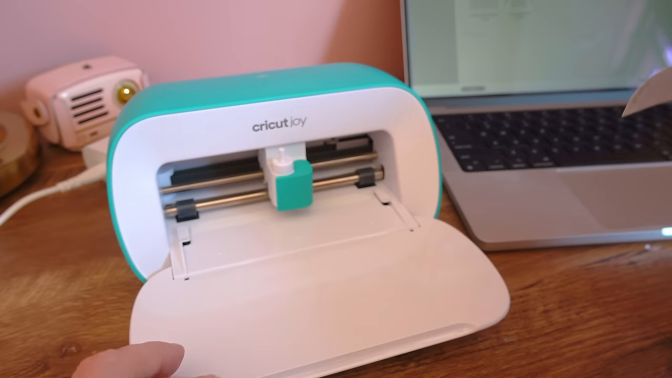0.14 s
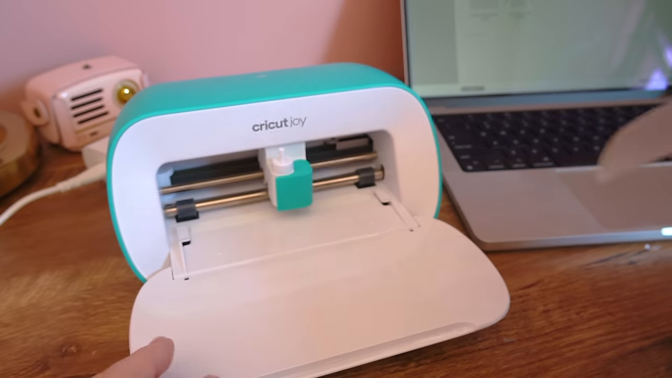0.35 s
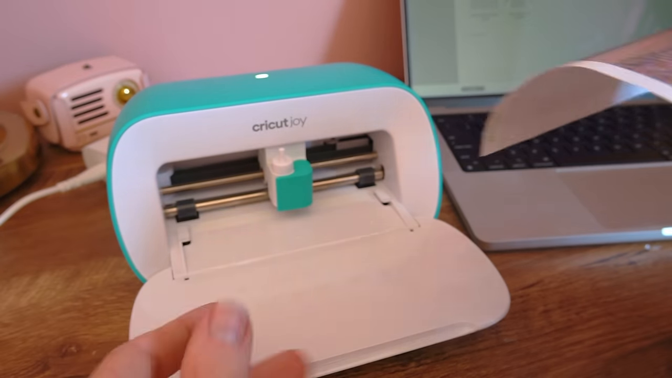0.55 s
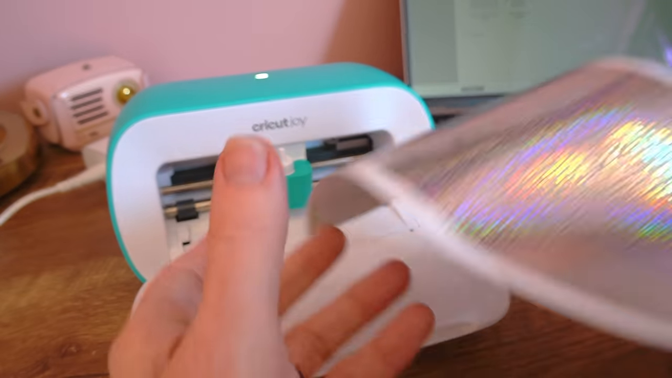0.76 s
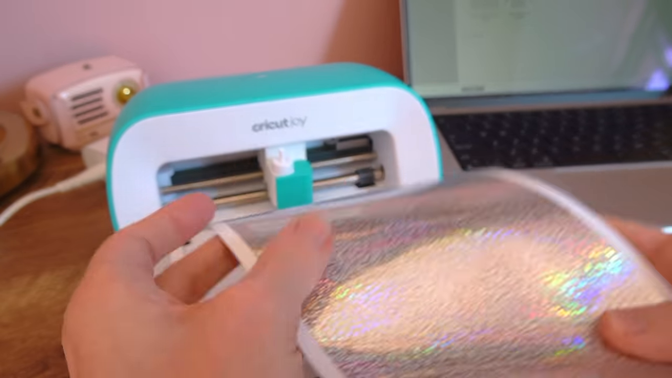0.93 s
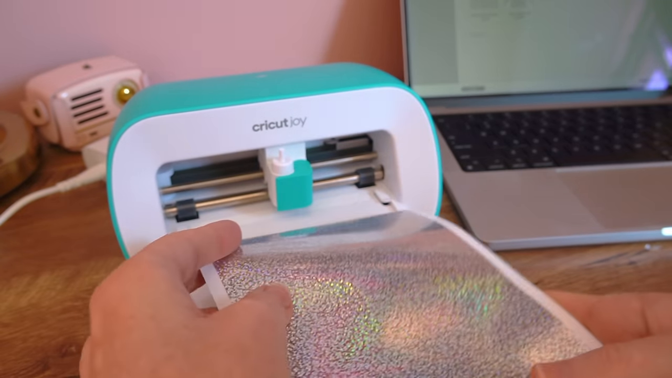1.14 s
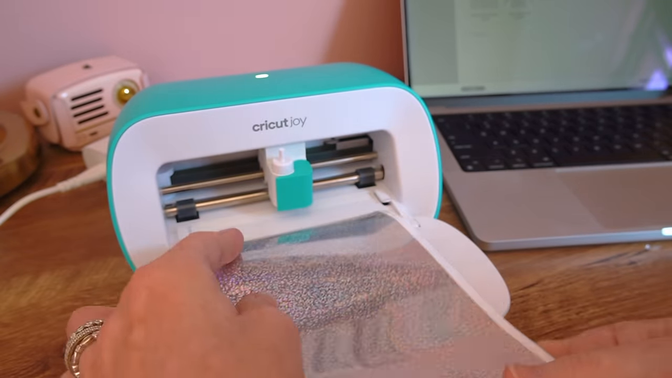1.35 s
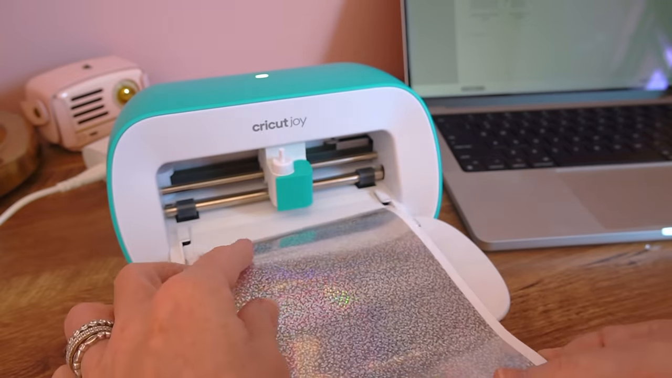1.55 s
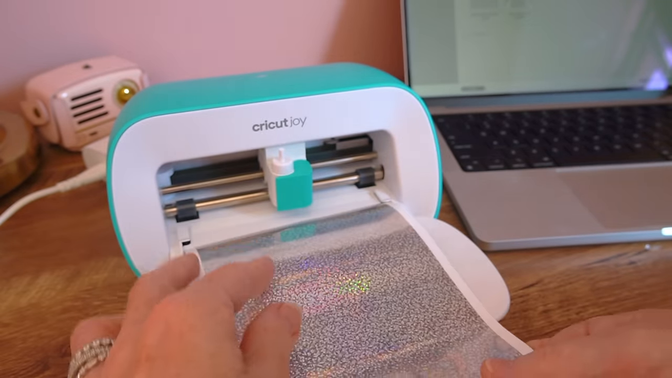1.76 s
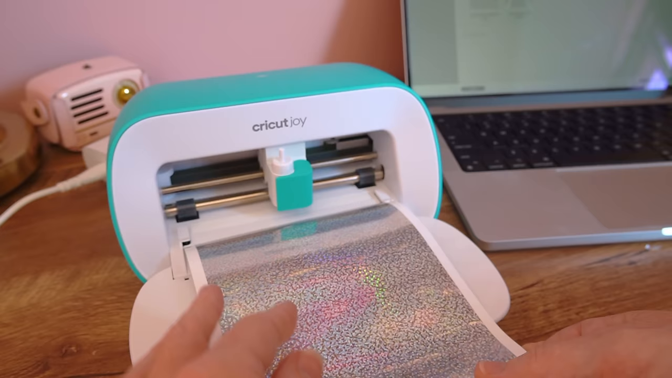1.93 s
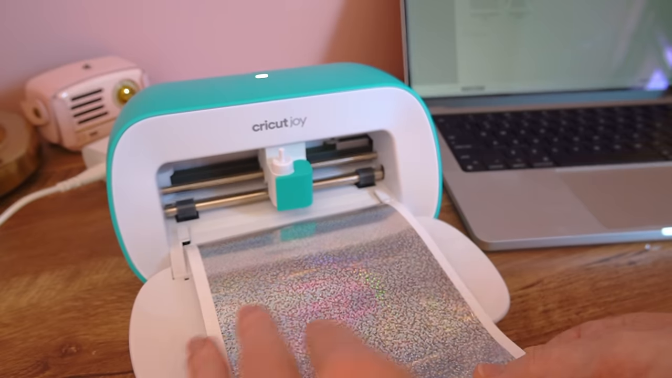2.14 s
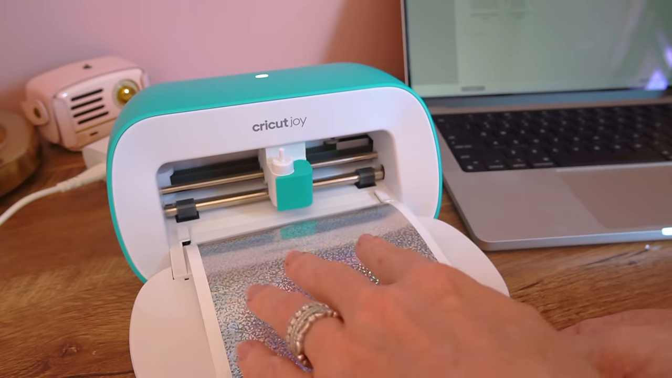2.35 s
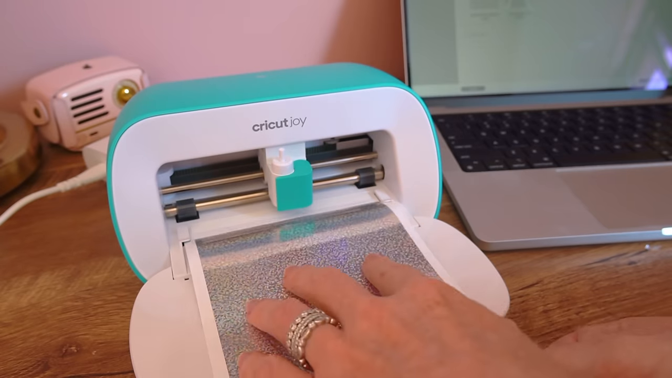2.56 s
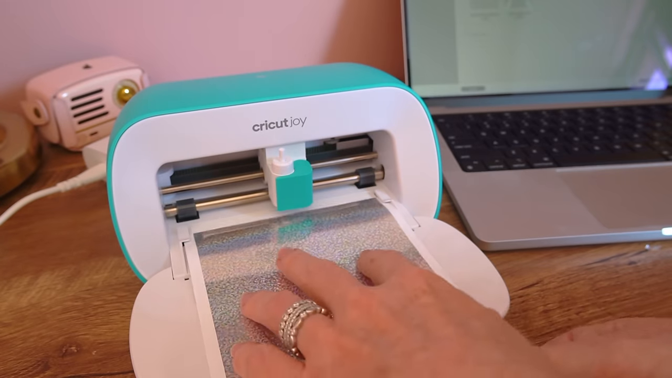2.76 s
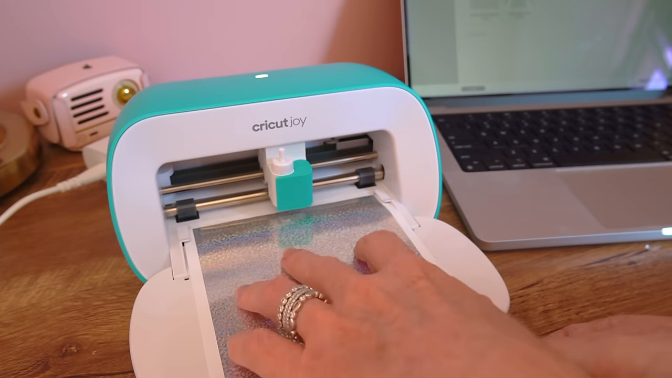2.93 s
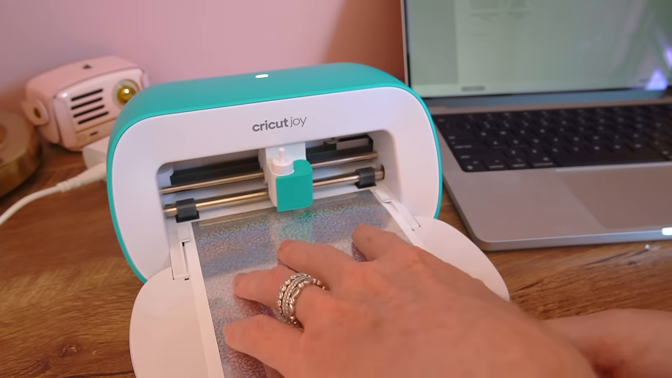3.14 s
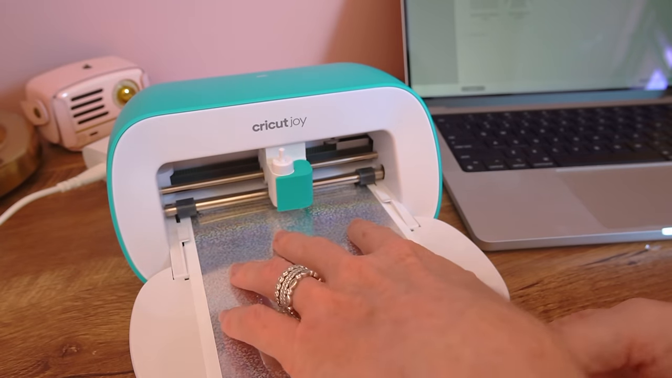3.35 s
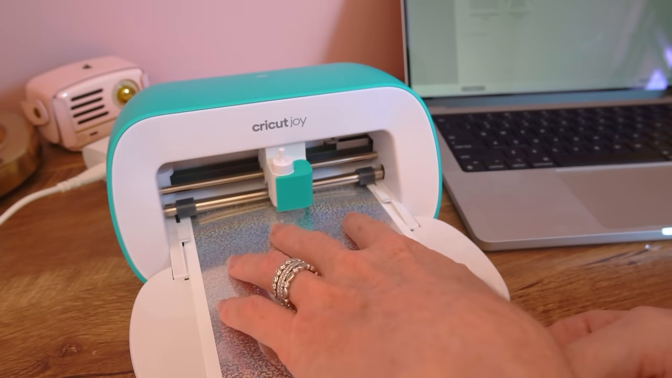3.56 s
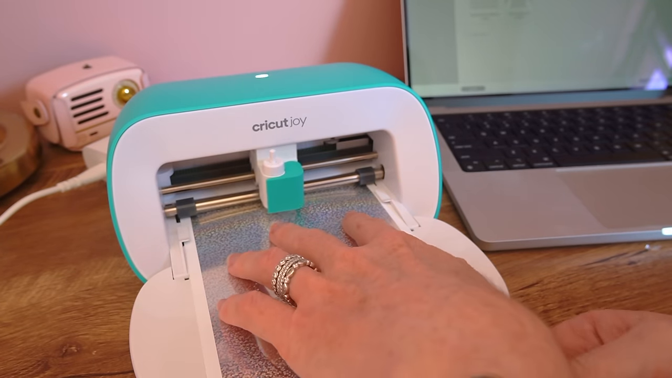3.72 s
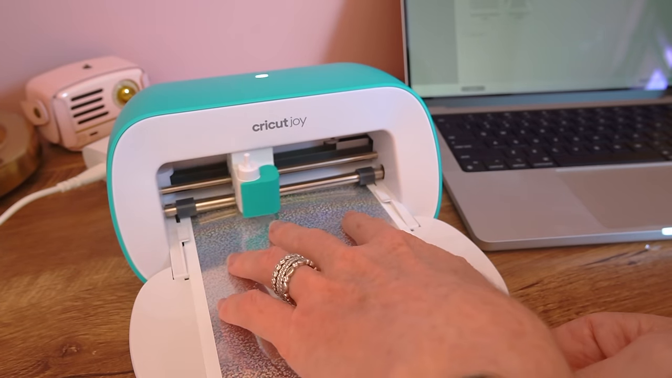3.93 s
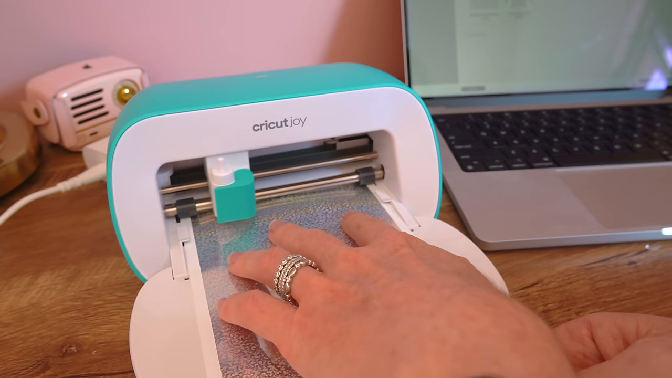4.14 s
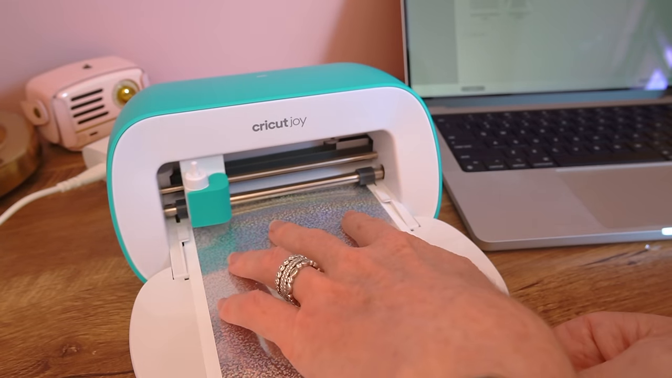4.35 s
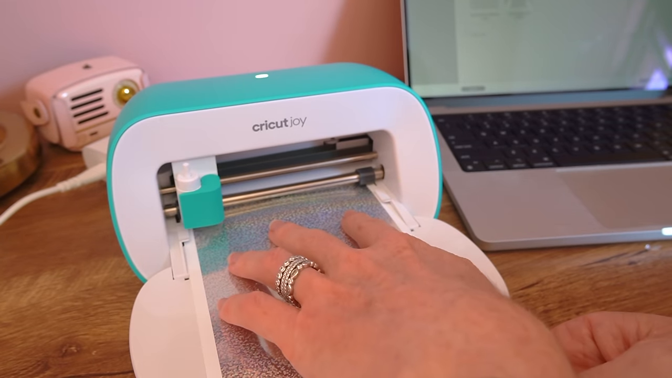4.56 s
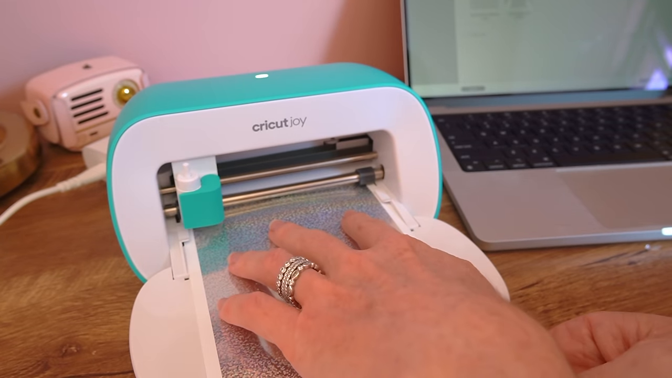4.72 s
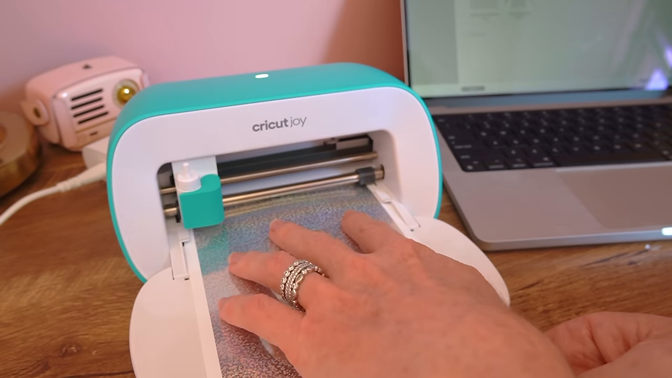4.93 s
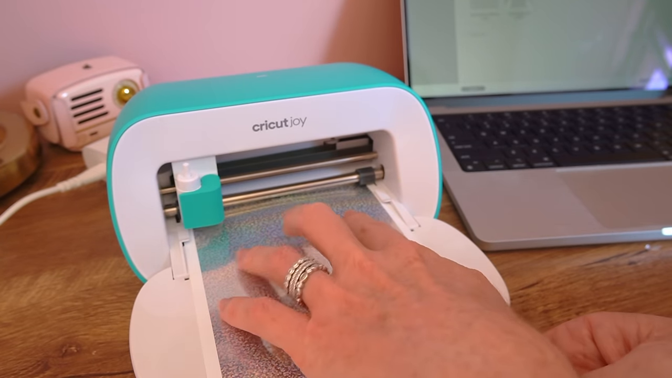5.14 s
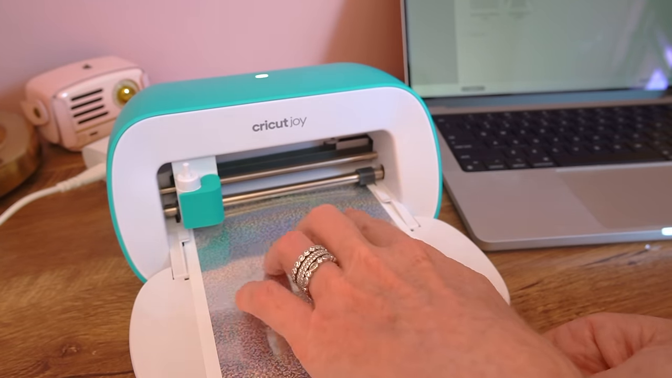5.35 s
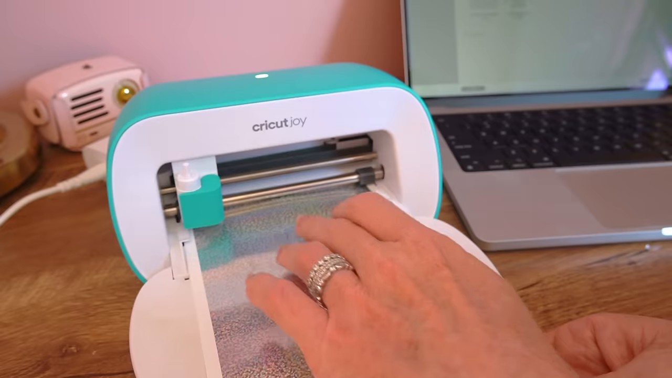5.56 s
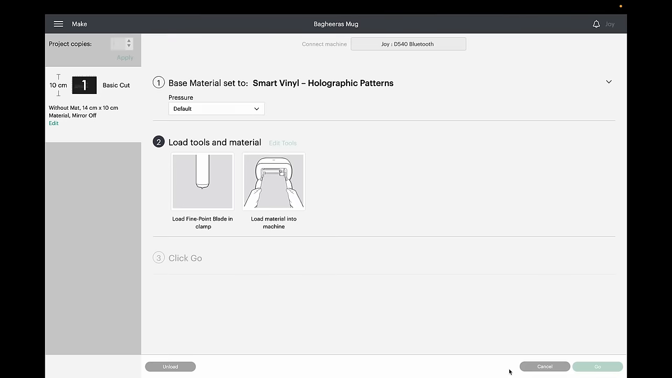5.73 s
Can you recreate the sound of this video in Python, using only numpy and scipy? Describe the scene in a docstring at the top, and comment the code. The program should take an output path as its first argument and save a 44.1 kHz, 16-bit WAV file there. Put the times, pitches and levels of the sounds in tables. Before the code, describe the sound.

A small, quiet room is heard from a microphone close to a desktop cutting machine, with soft air, a low rumble and a faint engine far outside until about 3.5 seconds. A stiff vinyl sheet ticks at 0.8 seconds and gives one loud, sharp snap at 1 second. It rubs and ticks softly on the plastic tray, with crisper cracks around 2.4 to 2.6 seconds. At 2.9 seconds the feed motor starts with a small jolt and its gears growl until 3.5. A few clacks at 3.6 lead into a louder, steady, medium-pitched whine with gear rattle. It ends at 4.4 seconds in a firm knock that rings the case, leaving a faint, thin tone fading. Quiet finger rubs and ticks follow. At 5.7 seconds a motor spins up again with a slight high squeak and a louder rising whine, lasting about a quarter second.

```python
"""A small, quiet room, one microphone close to a desk-top cutter. Hands slide a stiff plastic sheet
onto the tray; it rubs, snaps and ticks. The feed motor grips the sheet and its gears growl, then the
carriage motor whines across and knocks on its stop, ringing the case. After a pause a motor spins up
again with a brief squeak. Behind it all lie a low rumble, the room's air and an engine far outside."""
import sys
import numpy as np
from scipy import signal
from scipy.fft import rfft, irfft
from scipy.io import wavfile
from scipy.ndimage import uniform_filter1d

SR = 44100
rng = np.random.default_rng(int(sys.argv[2]) if len(sys.argv) > 2 else 0)


def file_out(sig):
    """Save sig as 16-bit WAV at sys.argv[1]."""
    # one column per channel
    cols = np.atleast_2d(sig).T
    # limit, then scale
    lim = np.clip(cols, -1, 1)
    pcm = np.round(lim * 32767).astype(np.int16)
    wavfile.write(sys.argv[1], SR, pcm)


N = 259749
TIME = np.arange(N) / SR

PINION_TEETH, POLES, CHOPPER_HZ = 11, 5, 15070
FEED_HZ, CRUISE_HZ = 14.95, 35.28  # shaft speeds of the feed and carriage motors
# Motor runs by name: on t/s, off t/s, silent t/s, starting shaft f/Hz, full shaft f/Hz, spin-up t/s,
# spin-up length/s, whine level/dB, whine swell/s, rattle level/dB, rattle swell/s, chopper level/dB,
# fade/(dB/s)
RUNS = {"feed": (2.908, 3.535, 3.6, FEED_HZ, FEED_HZ, 2.9, .01, -46, .008, -33, .008, -75, 110),
        "carriage": (3.59, 4.388, 4.62, 30, CRUISE_HZ, 3.59, .1, -29.5, .1, -35, 0.018, -68, 190),
        "restart": (5.7, 7, 5.95, 24, 35.5, 5.74, .15, -19, 0.02, -26, 0.04, -77, 100)}
# Lines of each motor's whine: multiple of shaft speed, relative level/dB
FEED_ORDERS = [(10, -5.5), (12.5, -3), (15, -4.5), (25, 0.5), (33, -5), (53, -0.5), (75, 0.5)]
CARRIAGE_ORDERS = [(3, -30.5), (5, -24), (10, -36), (11, 1.5), (13, -23.5), (15, -11.5), (22, -9.5),
                   (26, -17.5), (27, -21), (28, -18), (29, -17.5), (30, -26), (32, -16), (33, -5),
                   (33.8, -16.5), (35, -21.5), (44, -21), (45, -26.5), (46, -24), (67, -31.5), (86, -33),
                   (88, -30), (89, -33), (90, -22.5), (91, -30.5), (98, -31.5), (102, -38), (104, -29.5)]
RESTART_ORDERS = [(11, 2.5), (22, -11), (33, -27), (44, -32)]
# Gear rattle as heard through the plastic case: f/Hz, relative level/dB
FEED_COLOUR = [(50, -35), (110, -5), (270, -5.5), (450, 0.5), (700, -6.5), (950, -11.5), (1350, -13),
               (2000, -18), (2800, -20), (4000, -28), (5500, -32.5), (7500, -43), (10000, -53),
               (15000, -68)]
CARRIAGE_COLOUR = [(50, -13), (110, -14.5), (270, -11), (450, 1), (700, -6.5), (950, 2.5), (1350, -8),
                   (2000, -11.5), (2800, -14), (4000, -17), (5500, -22), (7500, -34), (10000, -41),
                   (15000, -57.5)]
RESTART_COLOUR = [(50, -40), (110, -27), (270, -9.5), (450, -8), (700, -16.5), (950, -11.5), (1350, -13),
                  (2000, -25.5), (2800, -27.5), (4000, -32), (5500, -39.5), (7500, -45.5), (10000, -52.5),
                  (15000, -62)]
# Case resonances on top of that rattle: f/Hz, width/Hz, lift/dB
FEED_RINGS = [(168.5, 28, 8.4), (373, 41, 9), (484, 49, 4.3), (829, 28, 12), (1133, 170, 14.1),
              (1480, 42, 3.3), (4730, 300, 5.9), (7900, 680, 4)]
CARRIAGE_RINGS = [(112, 19, 5.9), (178, 28, 6.3), (362, 89, 2.7), (455, 81, 3.5), (1220, 76, 9.9),
                  (1570, 180, 2), (2333, 100, 5.1), (3140, 255, 10.2), (3640, 300, 9.6), (6810, 89, 5.2),
                  (8760, 200, 4), (11200, 300, 5)]
RESTART_RINGS = [(660, 18, 17.8), (1028, 65, 12.3), (1184, 38, 11), (1393, 48, 3.7), (1750, 86, 4.1)]
# The case passes the whine unevenly: tooth-mesh f/Hz, gain/dB
MESH_GAIN = [(257, -4.5), (275, -3.5), (300, -12), (337, -9), (371, -1.5), (390, 0)]
# A brief dip in the whine: t/s, half width/s, gain/dB
WHINE_DIP = (4.28, .05, -3.5)
# The mechanism starting and stopping: t/s, peak level/dB, clack offset/dB
JOLTS = [(2.913, -19, -17), (3.562, -27, -14), (3.595, -24.5, -6), (3.602, -16.5, -10), (3.622, -21, -32.5),
         (3.651, -20.5, -28), (4.389, -10, 2), (4.466, -27, -14.5)]
# Modes of the case and of the tray: f/Hz, relative level/dB, t60/s
CASE_MODES = [(54.5, -25, 0.25), (116, -22.5, 0.2), (170.2, -14.5, 0.15), (231, -15, 0.11),
              (366.3, -4, 0.088), (523, -6, 0.064), (632, -10.5, 0.065), (951, -7.5, 0.03),
              (1017, -13, 0.053), (1227, -5.5, 0.029)]
TRAY_MODES = [(120, 4, .09), (175, 2, .06), (269.4, 0.5, .03), (380, -1, 0.041), (515, -0.5, .04),
              (690, 0, .035), (930, -3, .025), (1290, -4, .015)]
# The sheet snapping on the tray, close by: t/s, crack peak level/dB, crack f/Hz, edge offset/dB,
# thud offset/dB, thud centre f/Hz
TICKS = [(0.759, -26.5, 3120, -2, -3, 800), (0.8617, -42.5, 2870, -15, -22, 278),
         (0.9214, -27, 3260, -7.5, -27, 339), (1.0121, -2, 3050, -32, -20, 1000),
         (1.5457, -42, 3980, -22, -12, 657), (1.7173, -42.5, 1570, -20, 2.5, 704),
         (1.7694, -42.5, 1580, -11, -5, 522), (1.9287, -41, 2520, -20, 4, 670),
         (2.0197, -38, 2456, -22, -5, 490), (2.2516, -37, 1985, -14, -4.5, 686),
         (2.283, -34.5, 3160, -26, -16, 299), (2.315, -34.5, 2523, -23, -19, 645),
         (2.345, -37, 1570, -12, -6, 895), (2.4177, -21, 2140, -5, -13, 527),
         (2.42, -17, 2600, -4, -6.5, 564), (2.5496, -15, 2200, -7, -21.5, 705),
         (2.5773, -38.5, 1900, -4, -19, 312), (2.6228, -31.5, 1920, -6, -7, 730),
         (2.9914, -26.5, 2330, -28, -2, 705), (3.057, -29, 2270, -19, 2, 393),
         (3.263, -28.5, 2320, -12, -12, 377), (3.2891, -25, 1550, -9.5, -20, 480),
         (4.568, -42.5, 3500, -3, -3, 358), (4.7206, -45.5, 3500, -3, -9, 360),
         (4.7896, -51, 1510, -19, -8, 345), (5.106, -53.5, 1880, -12, 5, 353),
         (5.1419, -55, 1720, -11.5, 21, 258), (5.2052, -47, 1510, -3.5, 5, 400),
         (5.3301, -43.5, 1730, -5, 1, 330), (5.3994, -42, 3200, 1.5, -1.5, 256),
         (5.4778, -45, 1800, -13, 2.5, 258)]
# Sheet and fingers rubbing: t/s, bright level/dB, dull level/dB
RUB_LEVELS = [(0.0, -78, -67), (0.83, -66.5, -66.5), (1.1, -62, -62.5), (1.41, -57.5, -63),
              (1.66, -59, -62.5), (2.3, -63.5, -63.5), (2.45, -53.5, -58), (2.76, -56.5, -62.5),
              (2.9, -50.5, -64), (3.5, -70, -65), (4.5, -60.5, -54), (4.56, -76, -65), (4.9, -80, -74.5),
              (5.05, -80.5, -69), (5.23, -70.5, -65.5), (5.69, -72, -65)]
# Short scuffs of the sheet: t/s, length/s, bright level/dB, dull level/dB
SCUFFS = [(0.773, 0.053, -58, -76), (0.91, 0.084, -60, -76), (1.0, 0.13, -51, -48), (1.435, .04, -60, -56),
          (1.542, 0.03, -51, -63), (1.913, 0.051, -59.5, -62), (2.333, 0.049, -53, -59),
          (2.389, 0.12, -48.5, -51), (2.572, 0.042, -54, -57), (2.614, 0.036, -45.5, -49),
          (2.689, 0.077, -48, -51), (3.039, 0.048, -46, -63), (3.113, 0.063, -50, -60),
          (4.976, 0.04, -77.5, -61.5), (5.139, 0.026, -77, -58), (5.195, 0.05, -66, -57),
          (5.3, 0.077, -70, -61), (5.395, 0.05, -65, -58), (5.482, 0.088, -51, -49.5)]
# Bright and dull parts of the rubbing: f/Hz, relative level/dB
RUB_BRIGHT = [(600, -2.5), (1000, -2), (1500, -2.5), (2200, -4), (3200, -4), (4500, -9.5), (6000, -16.5),
              (8000, -23.5), (10500, -36), (15000, -46.5)]
RUB_DULL = [(150, -22), (300, 2), (700, -2.5), (1300, -13), (2200, -35.5)]
# Resonances of the sheet: f/Hz, width/Hz, gain/dB
SHEET_RINGS = [(1450, 240, -14), (2220, 300, -7.5), (3700, 400, -8), (4900, 510, -5.5), (8090, 430, 2.5)]
# Squeak at the start of the last run: t/s, length/s, f/Hz, level/dB
SQUEAK = (5.71, 0.2, 3749.5, -52.5)
# Engine far outside: t/s, firing f/Hz, level/dB, second harmonic level/dB
ENGINE_HUM = [(0, 42.3, -51, -66), (.3, 43.84, -48, -68), (.65, 44.2, -54, -60), (1.0, 44.2, -56, -70),
              (1.4, 47, -51.5, -70), (1.75, 50.4, -46.5, -72), (2.3, 50.1, -47, -76),
              (2.9, 48.8, -51.5, -66), (3.2, 46, -57, -62), (3.5, 44.7, -65, -75)]
# Rumble and still air around the microphone: f/Hz, relative level/dB
RUMBLE_COLOUR = [(15, 0), (30, -5), (60, 10.5), (110, -9), (175, 1.5), (300, -9.5), (500, -33)]
AIR_COLOUR = [(60, 1.5), (120, 5), (250, 0), (500, -13.5), (900, -24.5), (1600, -20.5), (3000, -31.5),
              (5000, -31), (8000, -37), (12000, -37), (15000, -38.5)]


def motor(run, orders, spectrum, rings, waver_db, slip, tooth_decay, shaft_db, repeat_share):
    """A geared motor close by: whine locked to the shaft, tooth rattle, and the chopped supply's tone."""
    shaft_hz, whine_db, rattle_db, chopper_db, running = motor_drive(*run)
    turns = np.cumsum(shaft_hz * (1 + slip * wander(30))) / SR
    whine = 0
    for order, db in orders:
        # the tooth-mesh line and its octave hold firm, the others come and go
        looseness = .3 if order in (PINION_TEETH, 2 * PINION_TEETH) else 1
        gain = amp(db + waver_db * looseness * wander(25.11))
        whine += gain * np.sin(2 * np.pi * (order * turns + rng.random()))
    # flaws of the gear come round on every turn; the rest of the rattle is new each time
    flaws = rng.standard_normal(1024)[(1024 * (turns % 1)).astype(int)]
    contact = np.sqrt(repeat_share) * flaws + np.sqrt(1 - repeat_share) * rng.standard_normal(N)
    tooth_bursts = np.exp(-tooth_decay * (PINION_TEETH * turns % 1))
    off_centre_swell = amp(shaft_db * np.sin(2 * np.pi * turns))
    rattle = colour(tooth_bursts * off_centre_swell * contact, spectrum, rings)
    commutator = 1 + .35 * np.cos(2 * np.pi * POLES * turns)
    chopper = commutator * np.sin(2 * np.pi * CHOPPER_HZ * TIME)
    tones = np.sqrt(2) * (amp(whine_db) * whine + amp(chopper_db) * chopper)
    return running * (tones + amp(rattle_db) * rattle)


def motor_drive(on_s, off_s, silent_s, start_hz, full_hz, spin_s, spin_length_s, whine_db, whine_swell_s,
                rattle_db, rattle_swell_s, chopper_db, fade_db_per_s, brake_hz_per_s=70):
    """Shaft speed, levels and gate of one run: it swells, holds, strains, loses current and coasts."""
    coast_s = np.maximum(TIME - off_s, 0)
    driven_hz = start_hz + (full_hz - start_hz) * ramp(spin_s, spin_length_s)
    shaft_hz = np.maximum(driven_hz - brake_hz_per_s * coast_s, 5)
    cut_db = -9 * ramp(off_s, .012) - fade_db_per_s * coast_s
    case_db = np.interp(PINION_TEETH * shaft_hz, *np.transpose(MESH_GAIN))
    dip_s, dip_width_s, depth_db = WHINE_DIP
    dip_db = depth_db * np.exp(-((TIME - dip_s) / dip_width_s) ** 2)
    whine_db += cut_db - 21.5 * (1 - ramp(on_s, whine_swell_s)) + case_db + dip_db
    starting = 1 - ramp(on_s, rattle_swell_s)
    strain_db = 3 * np.exp(-np.abs(TIME - off_s) / .02)  # the load rises just before the cut
    rattle_db += cut_db - 11.5 * starting + strain_db
    slow_swell_db = 4 * (np.cos(2 * np.pi * 2.75 * (TIME - 3.77)) - 1)
    chopper_db += cut_db - 21.5 * starting + slow_swell_db
    return shaft_hz, whine_db, rattle_db, chopper_db, ramp(on_s, .012) * (TIME <= silent_s)


def case_jolts(clack_t60_s=.021):
    """The case rings and clacks when gears take up slack or the carriage meets its stop."""
    out, t = np.zeros(N), TIME[:SR // 8]
    clack_band = signal.butter(2, [600, 5000], "band", fs=SR)
    for s, db, clack_db in JOLTS:
        add(out, s, amp(db) * ring(CASE_MODES, detune=.055))
        clack = rng.standard_normal(len(t)) * 1000. ** (-t / clack_t60_s)
        add(out, s, amp(db + clack_db - 8.5) * signal.lfilter(*clack_band, clack))
    return out


def sheet_ticks(stray_count=14, stray_over_rub_db=11, edge_hz=4620, thud_db_per_octave=9):
    """The stiff sheet cracks with a crisp edge and the tray thuds; faint strays follow the rubbing."""
    out, t = np.zeros(N), TIME[:SR // 8]
    rub_db = curves(RUB_LEVELS)[0]
    strays = [(when * TIME[-1], rub_db[int(when * N)] + stray_over_rub_db, 1500 + 1500 * pitch,
               -14, -8, 300 + 400 * thud) for when, pitch, thud in rng.random((stray_count, 3))]
    for s, db, crack_hz, edge_db, thud_db, thud_hz in TICKS + strays:
        t60_s = .012 * (1 - .025 * db)  # fainter snaps scrape longer
        burst, edge_burst = rng.standard_normal((2, len(t))) * 1000. ** (-t / t60_s)
        burst[0] += 12  # the snap itself
        crack = signal.lfilter(*signal.iirpeak(crack_hz, 2, fs=SR), burst)
        crack += .41 * signal.lfilter(*signal.butter(2, 800, "high", fs=SR), burst)
        crack = signal.sosfilt(signal.butter(4, 1.08 * crack_hz, fs=SR, output="sos"), crack)
        edge = signal.lfilter(*signal.iirpeak(edge_hz, 4, fs=SR), edge_burst) + .05 * burst
        edge = signal.lfilter(*signal.butter(1, 1.1 * edge_hz, fs=SR), edge)
        add(out, s, amp(db) * unit_peak(crack) + amp(db + edge_db) * unit_peak(edge))
        modes = [(hz, mode_db - thud_db_per_octave * abs(np.log2(hz / thud_hz)), t60)
                 for hz, mode_db, t60 in TRAY_MODES]
        add(out, s, amp(db + thud_db) * ring(modes, detune=.037))
    return out


def sheet_rubbing():
    """Sheet and fingers slide in dense, tiny, uneven slips; scuffs swell and fade on top."""
    bright_db, dull_db, sliding = curves(RUB_LEVELS)
    bright_gain, dull_gain = sliding * amp(bright_db), sliding * amp(dull_db)
    for s, length_s, bright_db, dull_db in SCUFFS:
        swell = np.sin(np.pi * np.linspace(0, 1, int(length_s * SR)) ** .75) ** 2
        add(bright_gain, s, amp(bright_db) * swell)
        add(dull_gain, s, amp(dull_db) * swell)
    slips = rng.standard_normal((2, N)) * amp(2.2 * rng.exponential(size=N) + 1.96 * wander(60))
    scrape = colour(slips[0], RUB_BRIGHT)
    for hz, width, db in SHEET_RINGS:  # the bending sheet brings its resonances in and out
        resonance = signal.lfilter(*signal.iirpeak(hz, hz / width, fs=SR), scrape)
        scrape += amp(db + 5.4 * wander(12)) * resonance
    return bright_gain * unit_rms(scrape) + dull_gain * colour(slips[1], RUB_DULL)


def squeak():
    """A short, wavering high tone as the last run bites."""
    s, length_s, hz, db = SQUEAK
    gate = ramp(s, .002) - ramp(s + length_s - .006, .006)
    return gate * tone(hz * (1 + .015 * wander(200)), db + 2 * wander(300))


def lingering_tone(fade_from_s=4.49, hz=660, db=-60.5, t60_s=1.6):
    """A thin tone dies away after the carriage stops."""
    fading_db = db - 60 * np.maximum(TIME - fade_from_s, 0) / t60_s
    return ramp(fade_from_s - .05, .1) * tone(np.full(N, hz), fading_db)


def far_engine():
    """An engine far outside hums at its firing rate and the octave above."""
    firing_hz, db, second_db, audible = curves(ENGINE_HUM)
    return audible * (tone(firing_hz, db) + tone(2 * firing_hz, second_db))


def room_tone(rest_db=-61, shake_db=7.5, fade_db_per_s=.44, air_db=-60.5):
    """Still air and a wavering rumble that swells while the motors shake the desk."""
    shake = sum(ramp(on_s, .1) - ramp(off_s, .15) for on_s, off_s, *_ in RUNS.values())
    rumble_db = rest_db - fade_db_per_s * TIME + shake_db * np.minimum(shake, 1) + 2.9 * wander(8)
    rumble = amp(rumble_db) * colour(rng.standard_normal(N), RUMBLE_COLOUR)
    return rumble + amp(air_db) * colour(rng.standard_normal(N), AIR_COLOUR)


def room(direct, t60_s=.24, echo_db=-13.5, top_hz=4500):
    """The direct sound reaches the microphone first, then dull, diffuse echoes off the near walls."""
    t = TIME[:SR // 2]
    tail = rng.standard_normal(len(t)) * 1000. ** (-t / t60_s) * (t > .003)
    tail = signal.lfilter(*signal.butter(1, top_hz, fs=SR), tail)
    return direct + amp(echo_db) * signal.fftconvolve(direct, tail / np.sqrt(np.sum(tail ** 2)))[:N]


def ring(modes, detune):
    """One blow on randomly detuned, decaying modes, neighbours in opposite sense; peak 1."""
    t = TIME[:SR // 4]
    tuning = 1 + detune * rng.standard_normal(len(modes))
    return unit_peak(sum((-1) ** k * amp(db) * np.sin(2 * np.pi * hz * tuning[k] * t)
                         * 1000. ** (-t / t60) for k, (hz, db, t60) in enumerate(modes)))


def colour(x, spectrum, rings=()):
    """Shape a sound by a spectrum and lift its resonances; rms 1."""
    size = N + N % 2
    f = np.maximum(np.fft.rfftfreq(size, 1 / SR), 1)
    point_hz, point_db = np.transpose(spectrum)
    db = np.interp(np.log(f), np.log(point_hz), point_db)
    db += sum(lift / (1 + (2 * (f - hz) / width) ** 2) for hz, width, lift in rings)
    return unit_rms(irfft(rfft(x, size) * amp(db))[:N])


def wander(rate_hz):
    """Smooth random drift; rms 1."""
    hold = int(SR / rate_hz)
    steps = np.repeat(rng.standard_normal(N // hold + 1), hold)[:N]
    return unit_rms(uniform_filter1d(uniform_filter1d(steps, hold), hold))


def curves(table):
    """A timed table's columns sample by sample, then a gate that is open over its span."""
    s, *columns = np.transpose(table)
    return [np.interp(TIME, s, column) for column in columns] + [(TIME >= s[0]) & (TIME <= s[-1])]


def tone(hz, db):
    """A sine on a pitch curve, at an rms level."""
    return np.sqrt(2) * amp(db) * np.sin(2 * np.pi * np.cumsum(hz) / SR)


def ramp(s, length_s):
    """Smooth step from 0 to 1."""
    x = np.clip((TIME - s) / max(length_s, 1e-3), 0, 1)
    return x * x * (3 - 2 * x)


def add(out, s, event):
    start = int(s * SR)
    out[start:start + len(event)] += event[:N - start]


def amp(db):
    return 10 ** (np.asarray(db) / 20)


def unit_rms(x):
    return x / np.sqrt(np.mean(x ** 2))


def unit_peak(x):
    return x / np.abs(x).max()


def scene():
    """At the desk: blows ring in the room; the motors, shut in their case, stir it less."""
    feed = motor(RUNS["feed"], FEED_ORDERS, FEED_COLOUR, FEED_RINGS,
                 waver_db=4, slip=.008, tooth_decay=.3, shaft_db=2.5, repeat_share=.18)
    carriage = motor(RUNS["carriage"], CARRIAGE_ORDERS, CARRIAGE_COLOUR, CARRIAGE_RINGS,
                     waver_db=4, slip=.0012, tooth_decay=1.26, shaft_db=1.7, repeat_share=.14)
    restart = motor(RUNS["restart"], RESTART_ORDERS, RESTART_COLOUR, RESTART_RINGS,
                    waver_db=1.2, slip=.003, tooth_decay=.79, shaft_db=1.5, repeat_share=.17)
    motors = feed + carriage + restart
    echoing = room(sheet_ticks() + case_jolts() + .15 * motors)
    close = .85 * motors + lingering_tone() + squeak() + sheet_rubbing()
    return (echoing + close + far_engine() + room_tone())[None]


def record(dry):
    """The microphone feeds a mono recorder that cuts steeply above 15750 Hz."""
    return signal.sosfilt(signal.ellip(12, .3, 60, 15750, fs=SR, output="sos"), dry)


dry = scene()
out = record(dry)
file_out(out)
```